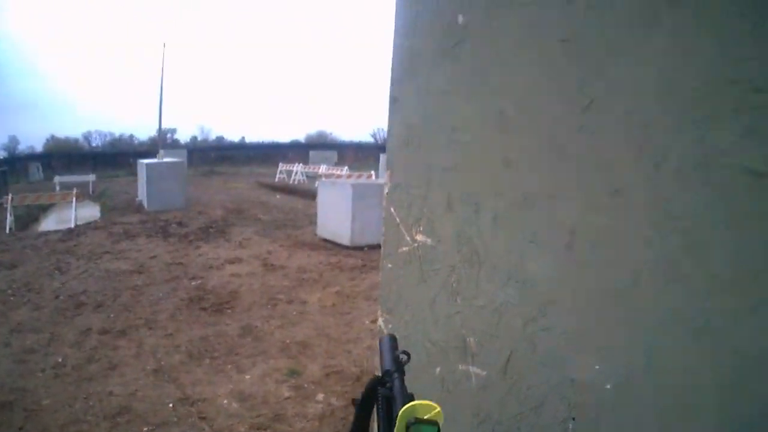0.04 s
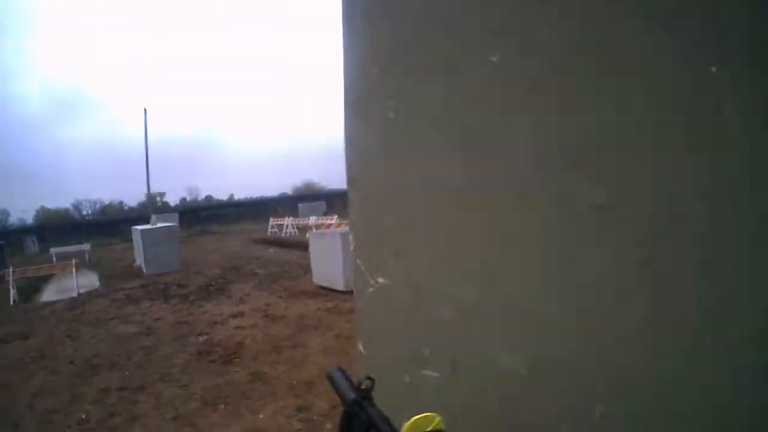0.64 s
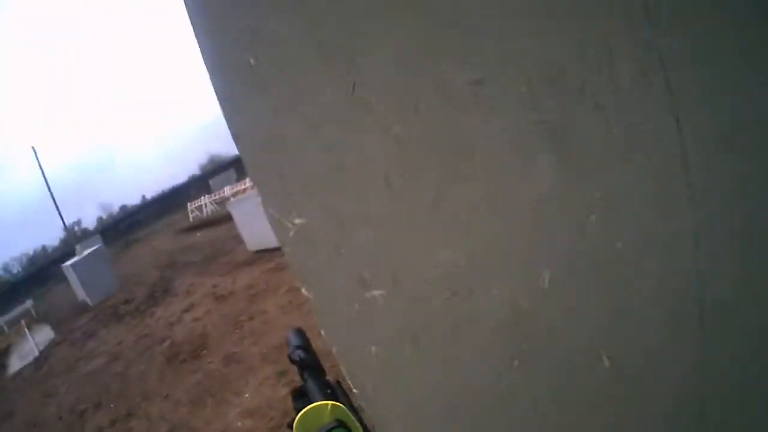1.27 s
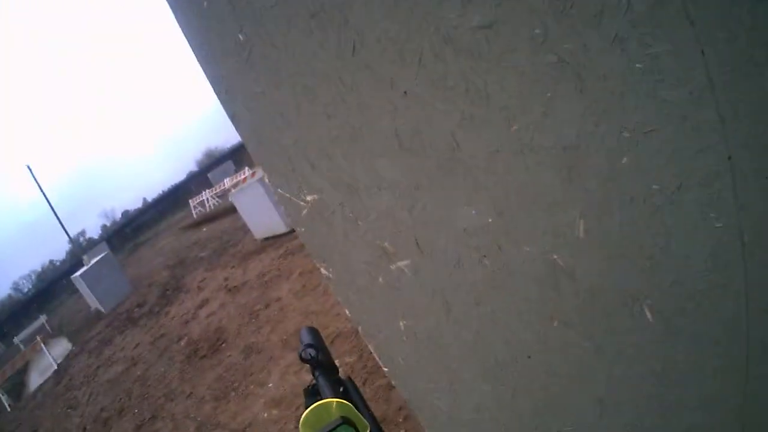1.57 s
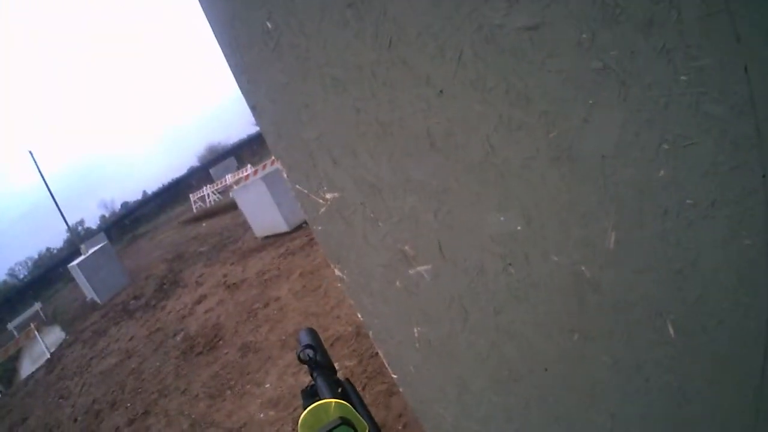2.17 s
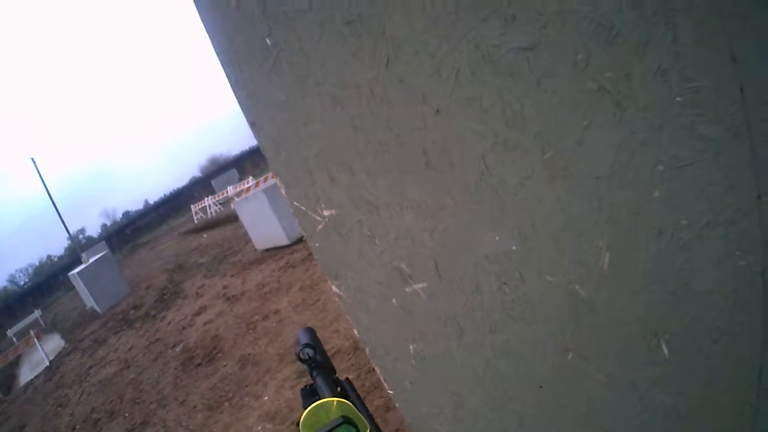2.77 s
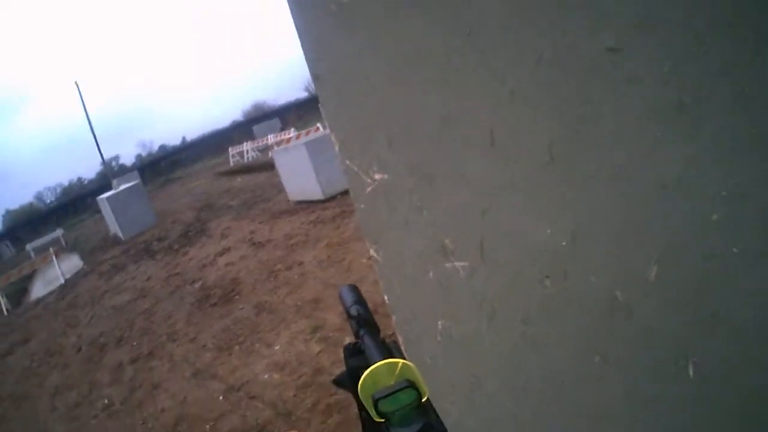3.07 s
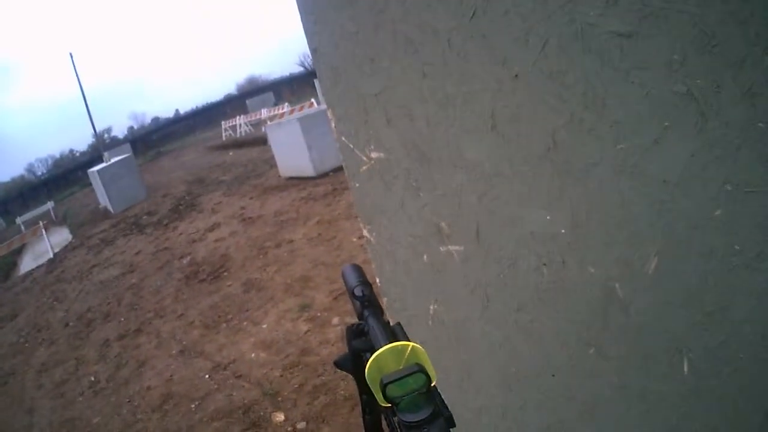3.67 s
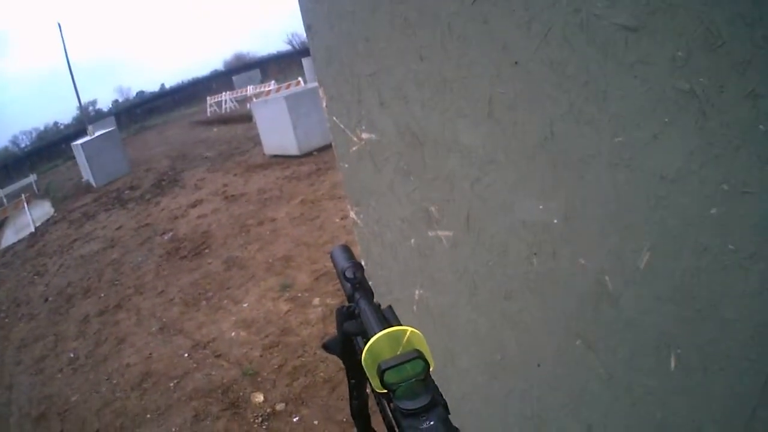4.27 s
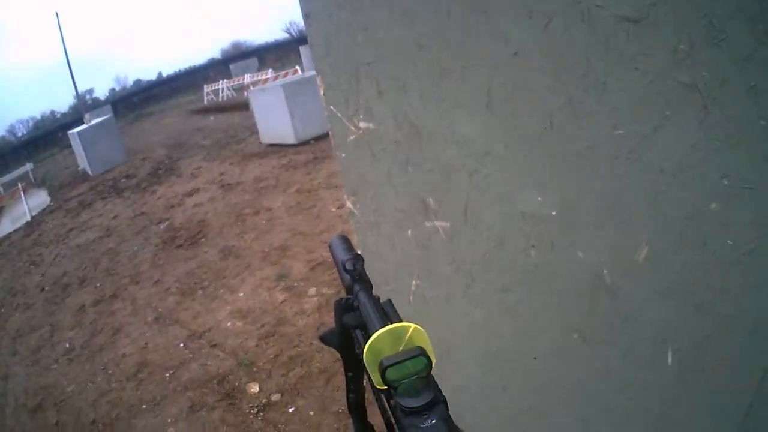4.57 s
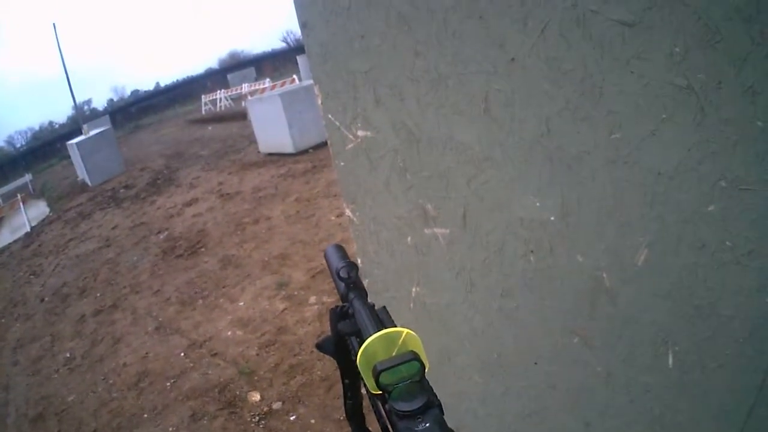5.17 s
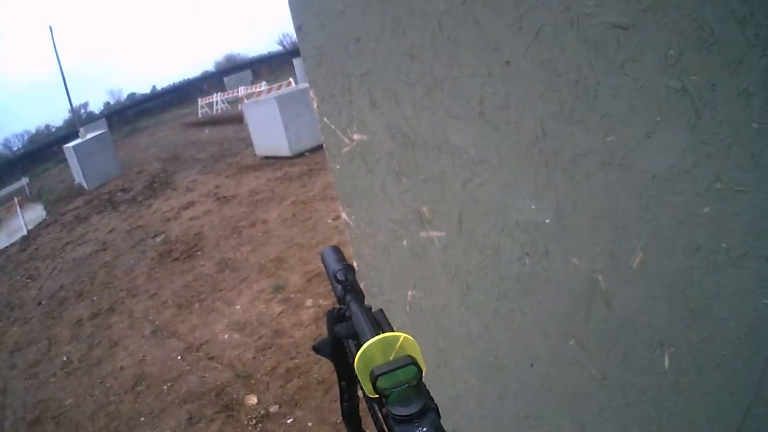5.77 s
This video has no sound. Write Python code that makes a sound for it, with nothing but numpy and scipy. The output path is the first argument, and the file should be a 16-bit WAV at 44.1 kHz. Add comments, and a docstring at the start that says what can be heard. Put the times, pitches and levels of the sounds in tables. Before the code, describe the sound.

On an open field, an electric airsoft gun some way off fires three short, rapid bursts of clicks over whirring gears, among small knocks and ticks nearby. Then a second airsoft gun, right by the microphone, fires a steady string of single and double shots. Each is a quick motor whirr and a hard, slightly hollow snap, often followed by a clack. Faint outdoor air lies underneath.

```python
"""An open field, beside a plywood wall, with the microphone close to an electric airsoft gun.
Further off another gun fires three short bursts, among small knocks and ticks around the player.
Then the near gun fires single and double shots: gears wind a spring, the piston is let go and slams
home, and the gears run down against a latch. The nearest blows overload the microphone."""
import sys
import numpy as np
from scipy import signal
from scipy.fft import rfft, irfft
from scipy.io import wavfile

SR = 44100
rng = np.random.default_rng(int(sys.argv[2]) if len(sys.argv) > 2 else 0)


def digitize_waveform(pressure):
    """Quantize a signal to 16-bit integers and store it at the path in sys.argv[1].

    Rows of a 2-D input are taken as channels; values are limited to [-1, 1].
    """
    field = np.atleast_2d(pressure).T
    bounded = np.clip(field, -1, 1)
    quanta = np.round(bounded * 32767).astype(np.int16)
    wavfile.write(sys.argv[1], SR, quanta)


N = 257103
TIME = np.arange(N) / SR


def undb(db):
    """Decibels to gain."""
    return 10 ** (np.asarray(db) / 20)


def unit(x):
    """Scale to rms 1."""
    return x / np.sqrt(np.mean(x ** 2))


def add(track, s, sound):
    """Mix a sound into the track at s seconds."""
    i = max(int(s * SR), 0)
    track[i:i + len(sound)] += sound[:N - i]


def convolve(x, response):
    """Pass x through an impulse response."""
    return signal.fftconvolve(x, response)[:N]


def band(x, hz, width):
    """One resonance, gain 1 at its centre."""
    return signal.lfilter(*signal.iirpeak(hz, hz / width, fs=SR), x)


def high_pass(x, hz):
    """Gently take away what lies below hz."""
    return signal.sosfilt(signal.butter(2, hz, "high", fs=SR, output="sos"), x)


def colour(x, tone, resonances=(), size=4096):
    """Causal filter of unit energy with a broad tone and narrow resonances on top."""
    hz, db = np.transpose(tone)
    bin_hz = np.arange(size // 2 + 1) * SR / size
    gain = undb(np.interp(np.log(bin_hz + 1), np.log(hz), db))
    # folding the cepstrum gives minimum phase
    cepstrum = irfft(np.log(gain))
    cepstrum[1:size // 2] *= 2
    cepstrum[size // 2 + 1:] = 0
    response = irfft(np.exp(rfft(cepstrum)))
    response = response + sum(undb(d) * band(response, f, w) for f, w, d in resonances)
    return convolve(x, response / np.linalg.norm(response))


def taps(events, lag=0):
    """One impulse for each (t/s, level/dB, ...) row, lag seconds later."""
    track = np.zeros(N)
    for s, db, *_ in events:
        add(track, s + lag, undb([db]))
    return track


# tone of the open air (f/Hz, level/dB)
FIELD_TONE = [(15, -47), (25, -8.5), (141, -6.5), (317, -9.5), (451, -10), (503, -10), (677, -11.5),
              (988, -12.5), (1370, -11.5), (1480, -14.5), (2220, -9), (4610, -22.5), (6740, -28.5),
              (7310, -25), (16000, -30.5)]


def field():
    """Background all round the microphone, with a steady ring near 2.3 kHz; its level sways slightly."""
    sway_db = np.interp(TIME, np.linspace(0, TIME[-1], num=60), rng.standard_normal(60))
    air = colour(rng.standard_normal(N), FIELD_TONE, resonances=[(2310, 240, 0)])
    return unit(air) * undb(-42 + sway_db)


def run(start, end, arcs, db=0, speed=1):
    """One stretch of turning gears: three tooth rates scaled by speed, three levels raised by db."""
    return (start, end, *(speed * np.array(arcs[:3])), *(db + np.array(arcs[3:])))


def gears(runs, resonances, whine_db, overtone_db, rough_db, wobble, surge_db):
    """Meshing teeth scrape one by one, surge with each pinion turn and whine at the tooth rate."""
    scraping, whining = np.zeros((2, N))
    for start, end, *controls in runs:
        u = np.linspace(0, 1, max(int((end - start) * SR), 2))
        # pitch and level follow a parabola through their three points
        arc = np.array([(1 - u) * (1 - 2 * u), 4 * u * (1 - u), u * (2 * u - 1)])
        hz, db = np.reshape(controls, (2, -1)) @ arc
        level = undb(db) * signal.windows.tukey(len(u), .05)
        slip, force, turn, grip = rng.standard_normal((4, 1024))
        knots = np.arange(len(slip))
        tooth = np.cumsum(hz) / SR  # teeth passed so far
        friction = rng.standard_normal(SR // 2)[:len(u)]
        strength = undb(rough_db * force[tooth.astype(int)] + surge_db * np.interp(tooth / 3, knots, turn))
        tooth_gate = np.exp(-2 * (tooth % 1))
        add(scraping, start, level * unit(friction * strength * tooth_gate))
        phase = 2 * np.pi * (tooth + wobble * np.interp(tooth / 6, knots, slip))
        # the teeth sing as the spring tightens, hardly at all when the motor is slow or coasting
        drive_db = 13 * min(np.log2(hz[-1] / 1150), 0) + 9 * (u - 1)
        pressure = undb(whine_db + drive_db + 3.5 * np.interp(tooth / 5, knots, grip))
        add(whining, start, level * pressure * (np.sin(phase) + undb(overtone_db) * np.sin(2 * phase)))
    return scraping, sum(undb(db) * band(whining, hz, width) for hz, width, db in resonances)


# bursts further off (first shot t/s, last shot t/s, tooth rate f/Hz at start, middle, end, level/dB)
FAR_BURSTS = [(0.201, 0.316, 3300, 3400, 2700, -30.5), (0.7436, 0.976, 3200, 3950, 3300, -32.5),
              (1.388, 1.449, 3095, 3150, 2900, -32.5)]
# the gears around a burst (tooth rate f/Hz at start, middle, end, level/dB re the burst at the same)
FAR_SPIN_UP = (1101.5, 1550, 1902, -4, -4.5, -2)
FAR_RUN_DOWN = (2699.5, 2000, 1200.5, 0.5, -7, -18)


def far_cycle():
    """The far motor spins up, runs through each burst and runs down."""
    runs = []
    for first, last, *rates, db in FAR_BURSTS:
        runs.append(run(first - .052, first, FAR_SPIN_UP, db))
        runs.append((first, last, *rates, db, db, db))
        runs.append(run(last, last + .2, FAR_RUN_DOWN, db))
    return runs


def chatter(impulses, decay):
    """Each impulse becomes a rattle of hard contacts that dies away over decay seconds."""
    return convolve(impulses, np.exp(-TIME[:SR // 4] / decay)) * rng.standard_normal(N)


# the far gun's shots (t/s, level/dB)
FAR_SHOTS = [(.199, -17), (.2664, -15.5), (.3168, -17.5), (.7438, -16.5), (.8117, -17.5), (.866, -18),
             (.907, -19), (.9778, -17), (1.3893, -19), (1.4502, -17.5)]
# tone of its clicks at a distance, and of either gun's scraping gears (f/Hz, level/dB)
FAR_TONE = [(150, -16), (500, -12), (780, -5.5), (930, 7.5), (1150, 0), (2200, -12.5), (3000, -2.5),
            (4200, -2), (5400, -22), (7000, -21), (8500, -27), (10200, -15.5), (11500, -41), (16000, -29)]
GEAR_TONE = [(100, -70), (300, -23), (450, -13.5), (900, -9), (1400, -4), (2250, -3), (2700, -6),
             (3600, -10), (4500, -16), (5600, -23), (7000, -33.5), (8800, -27.5), (11500, -42),
             (16000, -43.5)]
# resonances of its gear train, and ones shared by every gun sound (f/Hz, width/Hz, level/dB)
FAR_GEAR_MODES = [(1600, 400, -4), (2300, 250, -3), (3280, 300, 0), (3950, 300, -1)]
SHARED_MODES = [(740, 104, -8.5), (1444, 95, -1), (2010, 68, -9), (2170, 445, 6), (2338, 122, 9),
                (2800, 53, 6), (3160, 70, -5.5), (3690, 110, -8.5)]


def far_gun():
    """A faster gun well away from the microphone: a double click for each shot over whirring gears."""
    contacts = undb(-5.5) * taps(FAR_SHOTS) + undb(-7.5) * taps(FAR_SHOTS, lag=.006)
    clicks = colour(chatter(contacts, decay=.0048), FAR_TONE, SHARED_MODES)
    scrape, whine = gears(far_cycle(), FAR_GEAR_MODES,
                          whine_db=1, overtone_db=-20, rough_db=2.5, wobble=.19, surge_db=1.5)
    return clicks + undb(-.5) * colour(scrape, GEAR_TONE, SHARED_MODES) + whine


def echoes(x, t60, delay):
    """Scattered returns from barricades and trees reach the microphone without their top treble."""
    t = TIME[:SR]
    scatter = band(rng.standard_normal(SR), hz=1060, width=7700)
    tail = scatter * np.exp(-np.log(1000) * t / t60) * (t > delay)
    return convolve(x, tail / np.linalg.norm(tail))


# small knocks and ticks, among them a second clack of a near trigger pull and a light rebound off the near
# gun's latch (t/s, level/dB, f/Hz, width/Hz, decay/s)
KNOCKS = [(.441, -37.5, 3490, 5000, 0.0066), (0.638, -32, 2600, 3430, 0.018),
          (.764, -22.5, 890, 700, 0.0051), (.764, -24, 358, 220, 0.0057), (.920, -19.5, 560, 220, 0.0042),
          (0.9216, -20.5, 2070, 1450, 0.0052), (1.163, -31, 650, 600, 0.0026),
          (1.178, -28, 2640, 3850, 0.0045), (1.5655, -19, 2050, 870, 0.0028),
          (3.586, -11.5, 2250, 1500, 0.0043), (4.361, -26.5, 2090, 1790, 0.019),
          (5.392, -25, 2130, 1200, 0.0051)]


def knocks():
    """Short dull knocks and bright ticks: a brief contact rings one broad resonance."""
    track, t = np.zeros(N), TIME[:SR // 8]
    for s, db, hz, width, decay in KNOCKS:
        contact = np.exp(-t / decay)
        ring = band(band(contact * rng.standard_normal(len(t)), hz, width), hz, width)
        add(track, s, undb(db) * ring * np.linalg.norm(contact) / np.linalg.norm(ring))
    return track


# the near gun's trigger pulls (t/s, clack level/dB, motor speed ratio, whirr level/dB)
PULLS = [(1.7923, -8.5, 1, -1), (2.0572, -10.5, 1.19, 1.5), (2.3167, -10, 1.06, 1),
         (2.552, -13.5, 0.92, 0.5), (2.780, -14.5, 0.96, 1), (3.029, -12, 1.07, 1),
         (3.2935, -10.5, 0.99, 0), (3.5719, -11.5, 0.92, 0.5), (3.9872, -15.5, 0.88, 0),
         (4.3754, -8.5, 0.99, 0.5), (4.7277, -14.5, 0.98, -1), (5.1327, -16, .87, -0.5),
         (5.4642, -10, 1.2, -.5)]
# its gears in each phase of the cycle (tooth rate f/Hz at start, middle, end, level/dB at the same)
TAKE_UP_PLAY = (300, 602, 1000, -43, -39.5, -28)
WIND_SLACK = (1100, 1430, 1150.5, -21.5, -16, -16.5)
WIND_HALF_COCKED = (390, 741, 859.5, -28.5, -20.5, -20.5)
WIND_AGAIN = (2249, 1780, 1132, -15.5, -11.5, -19.5)
BRAKE = (2251, 1799.5, 620, -16.5, -14, -39.5)
COAST = (1692, 1229.5, 535, -44, -26.5, -43.5)
PLAY_S, RELEASE_S = .007, .009  # slack before the gears bite; from letting the piston go to its slam
SLACK_WIND_S, PAIR_S = .09, .15  # a longer wind starts from a slack spring; closer shots are a pair
BRAKE_S, COAST_S, COAST_LAG_S = .082, .098, .021


def firing_cycle():
    """A pull winds the spring; after the shot the gears wind again, brake or, after a pair, coast."""
    runs, times = [], np.array([shot[0] for shot in SHOTS])
    for s, _, speed, db in PULLS:
        shot = times[times > s][0]
        wind = WIND_SLACK if shot - s > SLACK_WIND_S else WIND_HALF_COCKED
        runs.append(run(s - PLAY_S, s, TAKE_UP_PLAY, db))
        runs.append(run(s, shot - RELEASE_S, wind, db, speed))
    gaps = np.diff(times, prepend=-np.inf, append=np.inf)
    for (s, _, wait, _, db), before, after in zip(SHOTS, gaps, gaps[1:]):
        if after < PAIR_S:
            runs.append(run(s + wait, s + after - RELEASE_S, WIND_AGAIN, db))
        elif before < PAIR_S:
            runs.append(run(s + COAST_LAG_S, s + COAST_LAG_S + COAST_S, COAST, db))
        else:
            runs.append(run(s + wait, s + wait + BRAKE_S, BRAKE, db))
    return runs


# resonances of the near gear train (f/Hz, width/Hz, level/dB)
GEAR_MODES = [(1220, 170, 3), (1440, 170, 4), (1780, 200, -6), (2400, 170, -2), (780, 150, -2)]
# tone of a hard contact's first crack (f/Hz, level/dB)
CRACK_TONE = [(100, -26), (1500, -9), (3000, 9), (6500, 1.5), (10000, -1.5), (16000, -11)]
# the gun's angle to the microphone bares more or less of its bright rasp (t/s, level/dB)
RASP = [(1.8, -4.5), (2.4, -8), (3.0, -13), (3.6, -16), (4.5, -35), (5.7, -22)]
# the unloaded gears (tooth rate f/Hz at start, middle, end, level/dB at the same)
SPIN_FREE = (1401, 1899.5, 2251.5, -21.5, -22, -21.5)
SPIN_FREE_S = .039


def gearbox():
    """Close up, the motor winds the spring, spins freely after each shot and catches the piston again."""
    loaded, whine = gears(firing_cycle(), GEAR_MODES,
                          whine_db=-1, overtone_db=-3.5, rough_db=2.5, wobble=.135, surge_db=2)
    free_runs = [run(s + .004, s + .004 + SPIN_FREE_S, SPIN_FREE) for s, *_ in SHOTS]
    free, _ = gears(free_runs, GEAR_MODES, whine_db=0, overtone_db=0, rough_db=3, wobble=0, surge_db=2)
    catches = [(s + wait, db) for s, _, wait, db, _ in SHOTS]
    clacks = chatter(taps(PULLS) + taps(catches), decay=.0042)
    whirr = colour(undb(1) * loaded + free + clacks, GEAR_TONE, SHARED_MODES)
    rasp_db = np.interp(TIME, *np.transpose(RASP))
    rasp = undb(rasp_db) * band(band(whirr, 4000, 1600), 4000, 1600)
    return whirr + rasp + whine + undb(-24) * colour(clacks, CRACK_TONE)


# the near piston's slams (t/s, level/dB, wait/s until the gears catch it, that clack's level/dB,
# level/dB of the whirr after it)
SHOTS = [(1.899, -1.5, .028, -5.5, -1.5), (2.1353, -2, 0.033, -6.5, -1), (2.3826, -1, 0.034, -4, 0),
         (2.612, -1.5, 0.031, -10, 0), (2.8427, 0, 0.03, -3, -2), (3.1025, -1.5, 0.029, -6, 0),
         (3.3556, 0, 0.031, -5, -1), (3.4705, -.5, 0.046, -13.5, 2.5), (3.6772, -1, 0.026, -9, 0),
         (4.051, -1, 0.031, -3, -1.5), (4.1696, 0, 0.046, -14.5, 1), (4.4748, 0, 0.027, -7, -1),
         (4.8001, 0.5, 0.033, -2.5, -1.5), (4.914, 0.5, 0.054, -6, 0), (5.2475, -.5, 0.031, -13, -.5),
         (5.525, 0, 0.033, -6, -1), (5.6398, -1, 0.088, -10.5, 3)]
# tone of the slam close to the microphone (f/Hz, level/dB)
SLAM_TONE = [(100, -54), (400, -14.5), (800, -6.5), (1400, -3.5), (2300, -4.5), (2900, -12), (4500, -22),
             (7000, -34), (10000, -31), (16000, -46)]
BOUNCE_S = .0024


def piston():
    """The last tooth lets go, the spring kicks the stock, the piston slams home and bounces once."""
    release = undb(-.5) * chatter(taps(SHOTS, lag=-.0119), decay=.0019)
    slide = undb(-7) * chatter(taps(SHOTS, lag=-.0086), decay=.017)
    slam = undb(1) * chatter(taps(SHOTS), decay=.0012)
    bounce = undb(-2.5) * chatter(taps(SHOTS, lag=BOUNCE_S), decay=.0038)
    body = colour(release + slide + slam + bounce, SLAM_TONE, SHARED_MODES)
    # slam and bounce each begin with a very short, bright crack
    contacts = undb(-8) * taps(SHOTS, lag=.0001) + undb(-10.5) * taps(SHOTS, lag=BOUNCE_S)
    crack = colour(chatter(contacts, decay=.0007), CRACK_TONE)
    # the spring's kick reaches the stock's lowest modes, the hard slam only the upper ones
    kick = undb(-14.5) * taps(SHOTS, lag=-.00872)
    jolt = undb(-13.5) * high_pass(taps(SHOTS, lag=.0014), 580)
    return body + crack + stock(kick + jolt)


# hollow modes of the stock (f/Hz, t60/s, level/dB)
STOCK_MODES = [(128.7, 0.082, -9), (207.2, 0.065, -4.5), (353, 0.035, -9), (372, 0.046, -3.5),
               (482, 0.065, -6), (713, 0.05, -8.5), (820, 0.062, -4)]


def stock(impulses):
    """The hollow stock booms; it is too small to radiate deep bass."""
    t = TIME[:SR // 4]
    modes = sum(undb(db) * np.sin(2 * np.pi * hz * t) * np.exp(-np.log(1000) * t / t60)
                for hz, t60, db in STOCK_MODES)
    return high_pass(convolve(impulses, modes), 115)


# the gears fall back on the latch (t/s, level/dB)
LATCH_HITS = [(2.0125, -5), (2.2585, -4), (2.501, -6), (2.730, -8), (2.9635, -2), (3.220, -6.5),
              (3.789, -10), (4.583, -11.5), (5.034, -7.5), (5.371, -3.5), (5.771, -10)]
# tone of that clack close to the microphone (f/Hz, level/dB)
LATCH_TONE = [(100, -35), (220, -13), (330, -3), (550, -2.5), (900, -6), (2250, -3.5), (2800, -9),
              (4000, -8), (5000, -19.5), (6700, -33), (9000, -28), (16000, -58)]


def latch():
    """The gears graze the latch, stop with a clack and rebound lightly."""
    graze = undb(-15) * chatter(taps(LATCH_HITS, lag=-.0047), decay=.0095)
    contacts = undb(-5.5) * taps(LATCH_HITS) + undb(-14) * taps(LATCH_HITS, lag=.002)
    clack = chatter(contacts, decay=.0054)
    rebound = undb(-18.5) * chatter(taps(LATCH_HITS, lag=.011), decay=.0081)
    return colour(graze + clack + rebound, LATCH_TONE, SHARED_MODES)


def scene():
    """The field at one microphone: a gun close by, another further off, knocks and faint echoes."""
    near = gearbox() + piston() + latch()
    distant = far_gun() + knocks()
    returns = echoes(undb(-23) * near + undb(-16.5) * distant, t60=.22, delay=.017)
    return (near + distant + returns + field())[None]


def record(dry):
    """The microphone flattens the loudest peaks; its electronics add a faint whistle and cut the top."""
    ceiling, knee = .74, 9
    whistle_hz, top_hz = 15553, 15900
    clipped = dry / (1 + np.abs(dry / ceiling) ** knee) ** (1 / knee)
    whistle = undb(-66) * np.sin(2 * np.pi * whistle_hz * TIME)
    low_pass = signal.ellip(10, .2, 70, top_hz, fs=SR, output="sos")
    return signal.sosfilt(low_pass, clipped + whistle)


dry = scene()
out = record(dry)
digitize_waveform(out)
```